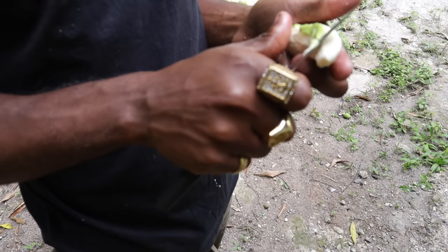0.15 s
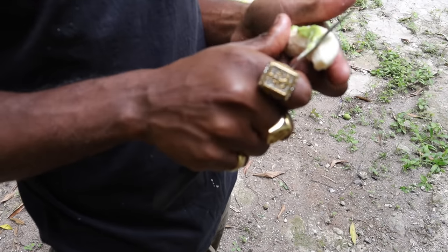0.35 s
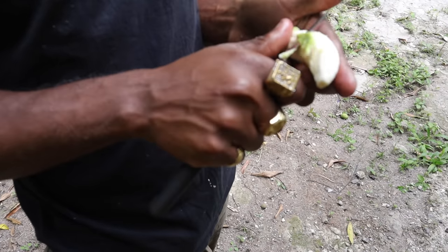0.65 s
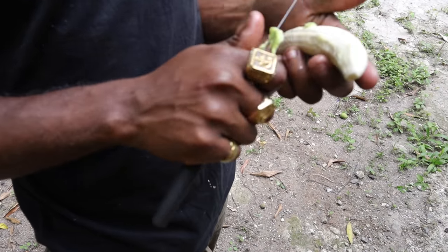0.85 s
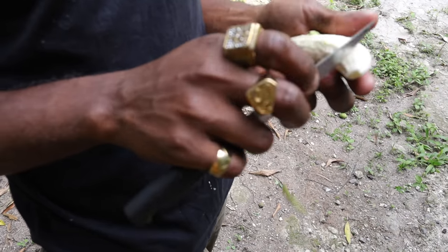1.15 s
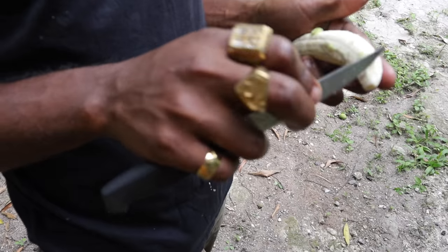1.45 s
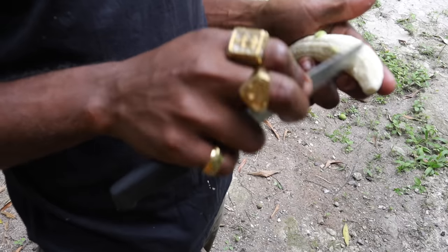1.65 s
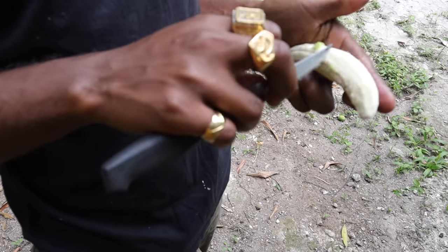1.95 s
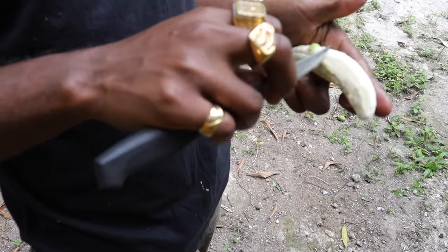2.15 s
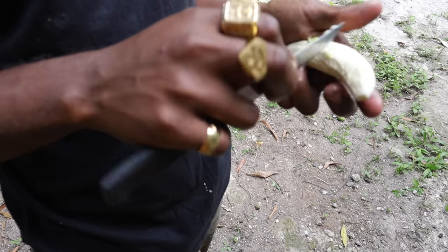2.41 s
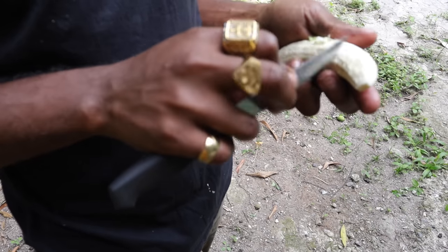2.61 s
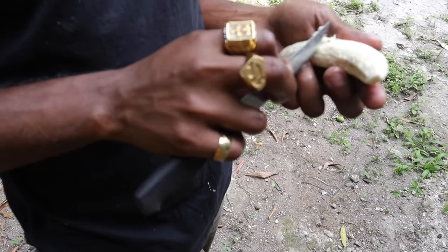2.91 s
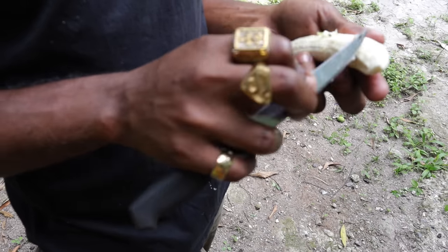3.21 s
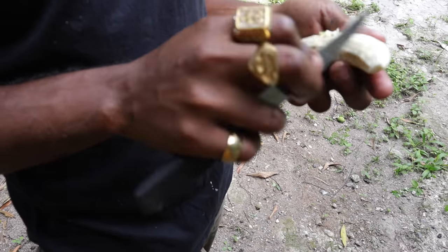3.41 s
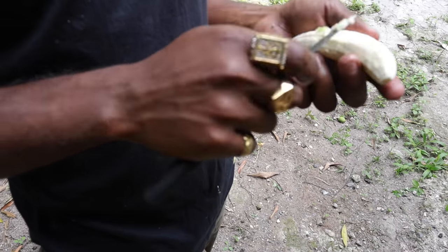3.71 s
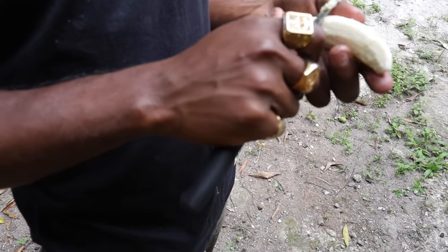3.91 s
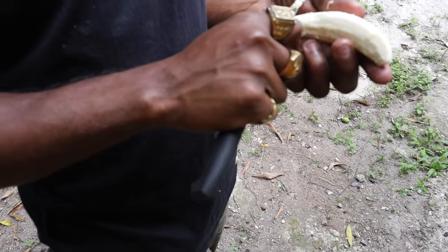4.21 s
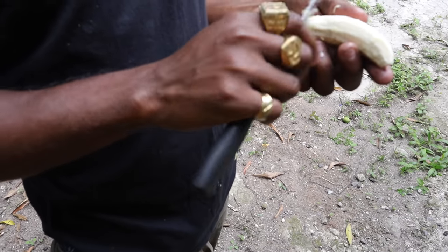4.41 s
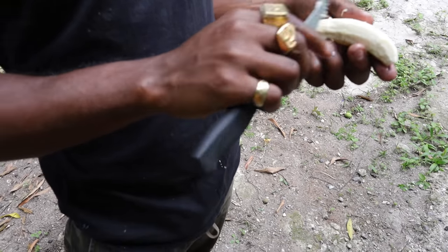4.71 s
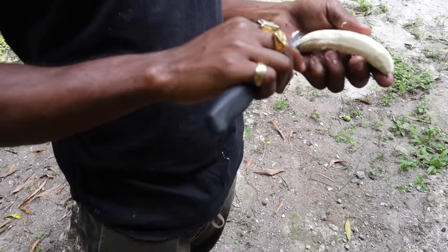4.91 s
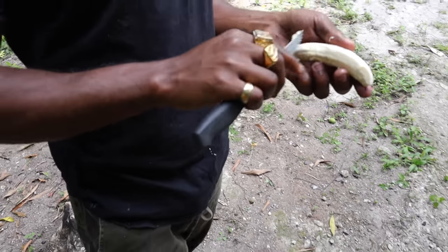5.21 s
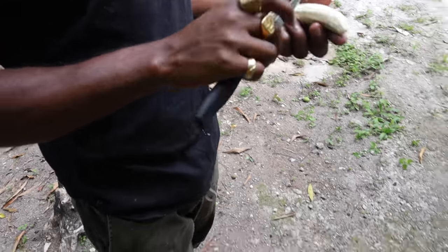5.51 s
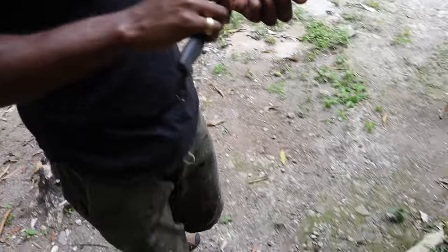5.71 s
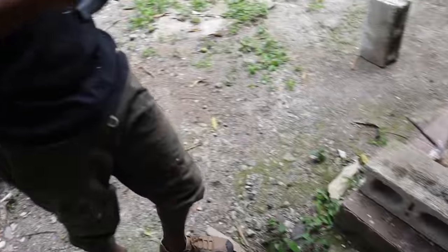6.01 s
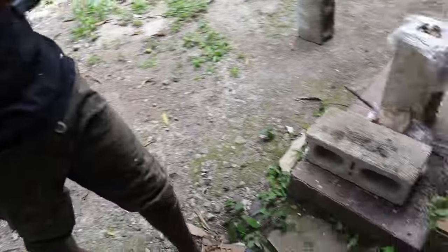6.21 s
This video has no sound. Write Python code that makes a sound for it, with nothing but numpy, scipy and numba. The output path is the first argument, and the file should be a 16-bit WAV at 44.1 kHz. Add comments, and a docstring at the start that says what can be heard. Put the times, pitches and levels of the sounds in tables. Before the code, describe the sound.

Short irregular knife scrapes on raw banana skin, close up in a quiet yard, with faint birdsong, then sharp snaps and shuffling feet.

```python
"""A knife scrapes the skin off a green banana held close, outdoors in a yard, over noise-band hush and breeze rumble.
From the start come short gritty strokes: hissing noise, and random slips that ring the fruit. Soon birds whistle
and a far animal hoots: gliding sines with echoes from the trees, a decaying noise tail. Fibres snap now and then,
and mostly in the later part: bursts of cracks ringing damped modes. There feet also knock, as damped sines,
and towards the end they shuffle, as short swells of grit noise."""
import sys
import numpy as np
from scipy import signal
from scipy.io import wavfile
from numba import njit

SR = 44100
rng = np.random.default_rng(int(sys.argv[2]) if len(sys.argv) > 2 else 0)


def master_out(mix):
    """Clip the mix to full scale and print it as 16-bit PCM to the path in sys.argv[1]."""
    frames = np.transpose(np.atleast_2d(mix))
    ceiling = np.clip(frames, -1, 1)
    pcm = np.round(ceiling * 32767).astype(np.int16)
    wavfile.write(sys.argv[1], SR, pcm)


N = 280035

# All levels are relative: mixing gains, filters or random flicker may follow.
# Hush of the yard, spectral density: hz, density_db_per_hz
HUSH_SPECTRUM = [(24, -17), (40, -8), (68, -2.5), (114, -8), (267, -5), (492, -8.5), (675, -7),
                 (1400, -12.5), (2390, -11), (2770, -9), (7900, -26), (11100, -21), (12200, -27),
                 (13500, -74)]
# Breeze rumble on the microphone, spectral density: hz, density_db_per_hz
RUMBLE_SPECTRUM = [(20, -24), (35, 5.5), (60, 7.5), (90, -2.5), (140, -4.5), (220, -17), (400, -29)]
# Gusts on the microphone: peak_s, level_db, width_s (standard deviation)
GUSTS = [(.15, -42, 0.019), (.82, -37, 0.062), (1.54, -45.5, 0.11), (1.74, -33, 0.04), (1.889, -33, 0.011),
         (1.95, -37, 0.015), (2.16, -48, 0.095), (2.305, -37.5, 0.021), (3.2, -49, 0.04),
         (3.352, -31, 0.027), (3.72, -51.5, 0.082), (4.359, -47, 0.074), (4.7, -55, 0.099),
         (6.24, -57, 0.022)]
# Bird whistles: start_s, length_s, first_hz, last_hz, bend (1 glides evenly, more settles early), level_db
BIRD_NOTES = [(.125, 0.025, 2600, 2330, 1.1, -45), (.15, .025, 2350, 2850, 1.1, -44),
              (.178, .04, 2750, 2150, 1.1, -46), (.342, 0.075, 2250, 3550, 1.2, -38.5),
              (1.17, .05, 3380, 2490, 1.2, -48.5), (1.24, .05, 2500, 2207, 1.2, -49),
              (1.945, 0.045, 2350, 3790, 1.1, -43), (2.47, 0.065, 3200, 2460, 1.2, -52),
              (3.748, 0.055, 3600, 2580, 1.5, -41), (3.815, 0.04, 2650, 2200, 1.1, -49),
              (3.888, 0.042, 2330, 3800, 1.2, -40.5), (4.95, 0.06, 2650, 3000, 1.1, -55),
              (5.28, .05, 4050, 3850, 1.1, -51), (5.3, 0.063, 3464, 2450, 1.1, -43),
              (5.86, 0.0345, 2810, 2290, 1.2, -43), (5.945, 0.03, 2650, 3080, 1.3, -47)]
# Far hoots, one with its lower octave: start_s, length_s, first_hz, last_hz, bend (as above), level_db
HOOT_NOTES = [(.492, 0.084, 643, 673, 3.4, -35), (.51, 0.21, 341, 342.5, 1.1, -50),
              (.572, 0.032, 634, 625, 1.1, -45), (.825, 0.088, 673, 634, 1.8, -45),
              (.91, 0.04, 640, 620, 1.1, -46.5), (2.25, 0.047, 628, 614, 1.2, -52)]
# Dull knocks of feet and hands: start_s, peak_db, pitch_hz, ring_cycles (until 60 dB down)
KNOCKS = [(4.348, -25, 760, 11.5), (4.9311, -19, 1080, 5), (4.938, -23.5, 960, 9), (4.944, -30, 780, 18),
          (5.235, -31, 465, 16), (5.26, -20, 413, 10), (5.268, -22.5, 670, 22), (5.578, -20.5, 765, 21),
          (5.593, -28, 690, 39), (5.647, -24, 890, 9), (6.178, -30, 1280, 4), (6.2271, -19.5, 906, 16),
          (6.233, -21.5, 686, 62), (6.284, -23.5, 483, 22), (6.297, -32, 345, 15)]
# Soles dragging on grit: peak_s, level_db
SHUFFLES = [(5.239, -37), (5.267, -40.5), (6.191, -39), (6.224, -28.5), (6.287, -42), (6.318, -36.5),
            (6.342, -36)]
# Grit under the soles, spectral density: hz, density_db_per_hz
GRIT_SPECTRUM = [(59, -34), (100, -8), (309, -12), (486, -6.5), (1200, -10.5), (5020, -26), (7050, -38),
                 (9000, -95), (11700, -125), (19800, -120)]
# Snapping fibres, and at 2.2758 s a hard catch of the edge sounding the same way: start_s, level_db,
# left_over_right_db, brightness (0-1)
SNAPS = [(0.024, -30, 5, 0), (0.3176, -32.5, -6, 1), (1.002, -10.5, -6.5, 0.98), (1.325, -24, -14, 0.94),
         (1.3316, -22.5, -9, 0.5), (1.3425, -32, -7, .4), (1.3562, -30, -9, 0.9), (1.534, -31.5, -12, 0.2),
         (1.735, -31.5, -9, 0.7), (2.0105, -29, -5, .5), (2.2077, -34, -5, .5), (2.2758, -20.5, -9, 0),
         (2.2786, -30, -1, .5), (3.902, -28.5, 0, 0.1), (4.1465, -36, -3, .3), (4.172, -26.5, 1, 0.62),
         (4.5372, -10, -7, 0), (4.718, -17.5, -17.5, 0.99), (4.722, -19, 6, 0.93), (4.75, -26.5, -4, 0.8),
         (4.9178, -13.5, -3, 0), (5.1273, -18, -7, 0.1), (5.1626, -23, -4, 0.82), (5.3558, -29, -8, 0.4),
         (5.3961, -5, -5, 0.25), (5.4147, -18, 3, 0.85), (5.456, -13.5, -6, 0), (5.485, -24.5, -2.0, 0.5),
         (5.643, -17.5, 0, 0.36), (5.6861, -22.5, 13, 0), (5.758, -9, -4.5, 0.15), (5.9475, -24, -2.0, 0),
         (6.2278, -20.5, 13, 0.49)]
# Dull modes of a snap: mode_hz, level_db, t60_s
DULL_MODES = [(745, -38, 0.0039), (1810, -6, 0.012), (1940, 4.5, 0.0089), (2370, 12, 0.0064),
              (3700, 19.5, 0.0014), (4500, -8, 0.001)]
# Bright modes of a snap: mode_hz, level_db, t60_s
BRIGHT_MODES = [(3900, 11, 0.0016), (6760, 8, 0.00088), (8600, -5, 0.0022), (10670, 6.5, 0.0061)]
# Knife strokes: start_s, slide_ms, hiss_db, bite_peak (share of the slide, 0-1), bite_db, fruit_ring_hz
STROKES = [(0.0, 47, -61, 0.8, -52.5, 2740), (0.3, 24, -61.5, 0.8, -51, 2560),
           (0.444, 124, -49, 0.2, -41, 2300), (0.657, 81.5, -47.5, 0.43, -37.5, 2280),
           (0.763, 28.3, -50, 0.6, -34.5, 2520), (1.02, 49, -57.5, 0.33, -41.5, 2670),
           (1.3, 60, -52.5, 0.71, -39.5, 2370), (1.529, 70, -46, 0.54, -33.5, 2300),
           (1.752, 100, -47, 0.43, -32, 2420), (1.978, 53, -52, 0.3, -37.5, 2410),
           (2.071, 20, -54.5, 0.45, -39.5, 2380), (2.19, 38, -51.5, 0.4, -39, 2400),
           (2.266, 25.4, -49, 0.4, -34.5, 2460), (2.621, 72, -49.5, 0.47, -32, 2340),
           (2.852, 63, -48.5, 0.57, -26.5, 2320), (3.085, 50.6, -48, 0.65, -29.5, 2340),
           (3.275, 76.6, -46, 0.61, -24.5, 2330), (3.528, 79, -47.5, 0.64, -31, 2290),
           (4.122, 47, -49, 0.4, -36, 2630), (4.273, 26, -58, 0.5, -61, 2260),
           (4.561, 73, -54, 0.42, -34.5, 2580), (4.852, 73, -47, 0.46, -28, 2500),
           (5.094, 49.5, -50, 0.45, -31.5, 2540), (5.354, 49, -50.5, 0.47, -26.5, 2480),
           (5.471, 28, -51.5, 0.3, -43, 2700), (5.672, 121, -50.5, 0.25, -29.5, 2330),
           (5.861, 34, -58.5, 0.46, -38, 2550), (5.958, 97, -47, 0.54, -31.5, 2240)]
# Hardest catches of the edge within the bites: catch_s, level_db
CATCHES = [(0.766, -28.5), (0.7742, -31), (0.7795, -25.5), (1.3346, -38), (1.3437, -41), (1.36, -23.5),
           (1.547, -39), (1.5735, -39), (1.5936, -36), (1.7817, -29), (1.8084, -23), (1.8239, -24.5),
           (1.9965, -30), (2.0135, -21), (2.0855, -31), (2.2, -35), (2.2087, -25), (2.2187, -30.9),
           (2.6565, -25), (2.6635, -21), (2.678, -22), (2.857, -22.5), (2.88, -19.5), (2.8954, -22.5),
           (2.9037, -30), (2.9172, -23.5), (2.931, -30.5), (3.098, -20.5), (3.11, -25.5), (3.1225, -24.5),
           (3.1285, -28), (3.138, -35), (3.293, -23), (3.3097, -23.5), (3.3208, -16.5), (3.343, -26.5),
           (3.3527, -40), (3.3634, -45), (3.5543, -43), (3.5734, -29.3), (3.588, -27), (3.6016, -23),
           (4.15, -24), (4.5704, -30.5), (4.5866, -30), (4.5985, -30.6), (4.62, -31), (4.8587, -21),
           (4.87, -25), (4.883, -28), (4.8934, -28.3), (4.9115, -20.5), (5.1074, -26.5), (5.1172, -33),
           (5.3736, -33), (5.383, -27), (5.3907, -26.6), (5.6569, -14), (5.676, -27), (5.6947, -19),
           (5.7157, -34), (5.7284, -33), (5.7453, -34), (5.976, -28), (5.9958, -21.5), (6.0123, -16),
           (6.0215, -30), (6.031, -38), (6.0496, -38)]
# Hiss of the blade, spectral density: hz, density_db_per_hz
EDGE_SPECTRUM = [(900, 5.5), (1500, -15.5), (3500, 3), (5500, 4), (7200, 9), (10000, 3), (12500, 7.5),
                 (14000, -18), (16000, -30)]
# Correlation of the two channels in noise: hz, correlation (-1 to 1)
CORRELATION = [(60, 1), (180, 0.93), (550, 0.04), (1650, -0.41), (4970, -0.68), (15000, -0.93)]

HUSH_DB, CALM_DB = -46, -51.5   # yard hush; breeze between gusts
BIRD_ECHO_T60_S, HOOT_ECHO_T60_S = 1, 0.54
BIRD_ECHO_DB, HOOT_ECHO_DB = 1.2, -6.5
DRAG_RISE_S, DRAG_FALL_S = 0.0015, 0.036   # time constants of a shuffle
TEAR_MS = 2.9   # time constant of the dying cracks of one fibre
BITE_WIDTH = 0.77   # share of the slide
CATCH_RISE_MS, CATCH_FALL_MS = 1.77, 1.86   # time constants of one catch's burst of slips
FRUIT_BANDWIDTH_HZ = 640   # of each of its two resonances in series
NOISE_TOP_HZ, CUTOFF_HZ = 12700, 16300   # upper limits of the coloured noises and of the whole


def amp(db):
    """Amplitude ratio is ten to the power of decibels over twenty."""
    return 10 ** (np.asarray(db) / 20)


def rms_one(x):
    """Dividing by the root mean square gives unit power."""
    return x / np.sqrt(np.mean(x ** 2) + 1e-20)


def at_hz(points, hz):
    """A curve is interpolated linearly along log frequency."""
    points = np.array(points)
    return np.interp(np.log(hz), np.log(points[:, 0]), points[:, 1])


def drift(rate):
    """Slow fluctuation: normal random knots, two per cycle of the rate in Hz, joined by straight lines."""
    knots = rng.standard_normal(int(N / SR * 2 * rate) + 3)
    return np.interp(np.arange(N) / SR * 2 * rate, np.arange(len(knots)), knots)


def noise():
    """White noise as two independent mid-side pairs."""
    return rng.standard_normal((2, 2, N))


def grains(per_s, spread_db):
    """Shot noise: random clicks of either sign and very uneven size."""
    sizes = amp(spread_db * np.minimum(rng.exponential(1, N), 4)) * rng.choice([-1, 1], N)
    return rms_one(sizes * (rng.random(N) < per_s / SR))


def ring(clicks, hz, t60):
    """Damped oscillator: a unit click starts a decaying sine of initial height near 1."""
    radius, angle = amp(-60 / (t60 * SR)), 2 * np.pi * hz / SR
    feedback = [1, -2 * radius * np.cos(angle), radius ** 2]
    return signal.lfilter([0, np.sin(angle)], feedback, clicks + 1e-18)


@njit
def moving_resonance(x, hz, r, sr):
    """Time-varying resonator: a pole pair of radius r follows the centre frequency hz."""
    y = np.zeros(len(x))
    for i in range(2, len(x)):
        y[i] = x[i] - x[i - 2] + 2 * r * np.cos(2 * np.pi * hz[i] / sr) * y[i - 1] - r * r * y[i - 2]
    return y


def coloured(spectrum, source, patchy_db, wide=1.):
    """Subband shaping: half-octaves, each with its level, flicker and stereo correlation; top cut, rms 1."""
    out, edges = 0, 20 * 2 ** np.arange(0, 10, .5)
    for k, (low, high) in enumerate(zip(edges, edges[1:])):
        hz = np.sqrt(low * high)
        if spectrum[0][0] / 1.5 < hz < spectrum[-1][0] * 1.2:
            band = signal.butter(2, [low, high], "band", fs=SR, output="sos")
            mid, side = signal.sosfilt(band, source[k % 2])   # neighbouring bands stay independent
            alike = np.clip(1 - wide * (1 - at_hz(CORRELATION, hz)), -1, 1)
            gain = amp(at_hz(spectrum, hz) + patchy_db * drift(9))
            stereo = np.sqrt(1 + alike) * mid + np.sqrt(1 - alike) * side * [[1], [-1]]
            out = out + gain * stereo
    top_cut = signal.butter(14, NOISE_TOP_HZ, fs=SR, output="sos")
    return rms_one(signal.sosfilt(top_cut, out))


def hush():
    """Diffuse ambience: steady coloured noise, a little stronger on the right."""
    return amp(HUSH_DB) * coloured(HUSH_SPECTRUM, noise(), patchy_db=2.5) * amp([[-.7], [.7]])


def breeze():
    """Wind noise: a low rumble whose amplitude swells as a Gaussian in each gust."""
    t = np.arange(N) / SR
    level = amp(CALM_DB)
    for peak_s, db, width_s in GUSTS:
        level = level + amp(db) * np.exp(-.5 * ((t - peak_s) / width_s) ** 2)
    rumble = coloured(RUMBLE_SPECTRUM, noise(), patchy_db=3.5, wide=6.8)
    return level * rumble * amp([[1.2], [-1.2]])


def trees(x, t60, wet_db):
    """Scattering: convolution with an exponentially dying noise tail, another one for each side."""
    t = np.arange(SR) / SR
    tail = rng.standard_normal((2, SR)) * amp(-60 * t / t60) * np.minimum(t / 0.0038, 1)
    tail = tail - 0.12 * tail[::-1]   # the wide microphone sets the sides against each other
    tail = amp(wet_db) * tail / np.sqrt(np.sum(tail ** 2, axis=1, keepdims=True))
    return signal.fftconvolve(x[None], tail, axes=1)[:, :N]


def whistle(notes, waver, flutter_db, swell_share):
    """Frequency modulation: sines glide to their last pitch, swelling and fading; pitch and level waver."""
    out, wobble = np.zeros(N), 1 + waver * drift(70)
    for start_s, length_s, first_hz, last_hz, bend, db in notes:
        gone = np.linspace(0, 1, round(length_s * SR))   # share of the note
        at = round(start_s * SR)
        span = slice(at, at + len(gone))
        hz = last_hz + (first_hz - last_hz) * (1 - gone) ** bend
        phase = 2 * np.pi * np.cumsum(hz * wobble[span]) / SR
        swell = np.sin(np.pi / 2 * np.minimum(np.minimum(gone, 1 - gone) / swell_share, 1))
        out[span] += np.sqrt(2) * amp(db) * swell * np.sin(phase)
    return out * amp(flutter_db * drift(40))


def birds():
    """Direct and scattered sound: whistles stronger on the left, opposite in phase on the right, with echoes."""
    direct = whistle(BIRD_NOTES, waver=0.0249, flutter_db=3.0, swell_share=0.24)
    return direct * [[1.1], [-.45]] + trees(direct, BIRD_ECHO_T60_S, BIRD_ECHO_DB)


def hoots():
    """Direct and scattered sound: low, nearly level tones in the centre, with a weaker, shorter echo."""
    direct = whistle(HOOT_NOTES, waver=0.007, flutter_db=.6, swell_share=0.39)
    return direct + trees(direct, HOOT_ECHO_T60_S, HOOT_ECHO_DB)


def knocks():
    """Impact: a soft contact pulse excites two damped modes of the hollow ground."""
    out = np.zeros(N)
    for start_s, db, hz, cycles in KNOCKS:
        click = np.zeros(4000)
        click[:14] = -np.hanning(14)
        sound = ring(click, hz, cycles / hz) + 0.89 * ring(click, 1.84 * hz, 0.2 * cycles / hz)
        at = round(start_s * SR)
        out[at:at + 4000] += (amp(db) * sound / np.abs(sound).max())[:N - at]
    return out


def shuffles():
    """Friction: soles drag on grit, noise that rises abruptly and decays exponentially."""
    peak_s, db = np.array(SHUFFLES).T
    since = np.arange(N) / SR - peak_s[:, None]
    drag = amp(db) @ np.exp(-np.abs(since) / np.where(since < 0, DRAG_RISE_S, DRAG_FALL_S))
    grit = noise() * amp(4.6 * drift(55))
    return drag * coloured(GRIT_SPECTRUM, grit, patchy_db=1.0, wide=0.5)


def strike(modes, cracks):
    """Modal superposition: the same cracks excite every damped mode."""
    return sum(amp(db) * ring(cracks, hz, t60) for hz, db, t60 in modes)


def snaps():
    """Fracture: a fibre tears in a few fast dying cracks, each exciting dull and bright modes."""
    length = 2000
    out = np.zeros((2, N + length))
    fading = np.exp(-np.arange(length) / (SR * TEAR_MS / 1000))
    for start_s, db, pan_db, bright in SNAPS:
        chance, size, side_sign = rng.random((3, length))
        cracks = (chance < .09) * (2 * size - 1) * fading * 0.76
        cracks[0], cracks[5] = -.6, 1.1   # a pull, then the release
        share = np.clip(bright, 0, 1)
        sound = (1 - share) * strike(DULL_MODES, cracks) + share * strike(BRIGHT_MODES, cracks)
        # the treble differs on the two sides
        wide = share * ring(cracks * np.sign(side_sign - .5), 9260, 0.0016) * 5.9
        gain = amp(db) / np.abs(sound).max() * amp([[pan_db / 2], [-pan_db / 2]])
        at = round(start_s * SR) + 25   # the first crack sounds 25 samples after start_s
        out[:, at:at + length] += gain * (sound + wide * [[1], [-1]])
    # a small source radiates no bass
    return signal.sosfilt(signal.butter(2, [450, 11000], "band", fs=SR, output="sos"), out[:, :N])


def stroke_envelopes():
    """Sliding contact: the hiss starts abruptly and trails off, the bite peaks within the slide."""
    hiss, bite, ring_hz = np.zeros(N), np.zeros(N), np.full(N, float(STROKES[0][-1]))
    for start_s, slide_ms, hiss_db, bite_at, bite_db, hz in STROKES:
        near = slice(max(round((start_s - .1) * SR), 0), min(round((start_s + .3) * SR), N))
        since_ms = (np.arange(near.start, near.stop) / SR - start_s) * 1000
        middle = np.abs(2 * since_ms / slide_ms - 1)   # 0 mid-stroke, 1 at its ends
        steepness = np.where(since_ms < slide_ms / 2, 5.0, 3.3)
        hiss[near] += amp(hiss_db - 3.85 * middle ** steepness)
        off = 2 * (since_ms / slide_ms - bite_at) / BITE_WIDTH
        off = np.where(off < 0, -1.25 * off, 0.89 * off)   # it digs in faster than it lets go
        bite[near] += amp(bite_db - 4.0 - 4.45 * off ** 2.22)
        ring_hz[max(round((start_s - .03) * SR), 0):] = hz
    return hiss, bite, ring_hz * (1 + .06 * drift(45))   # the grip shifts within a stroke


def strokes():
    """Stick-slip friction: the edge hisses; where it bites, dense slips ring the fruit in the cupped hand."""
    hiss, bite, ring_hz = stroke_envelopes()
    damping = np.exp(-np.pi * FRUIT_BANDWIDTH_HZ / SR)

    def fruit(x):
        """Cascaded resonance: two equal resonators follow the pitch of the fruit."""
        once = moving_resonance(x, ring_hz, damping, SR)
        return moving_resonance(once, ring_hz, damping, SR)

    catches = np.zeros(N)
    for catch_s, db in CATCHES:
        catches[round(catch_s * SR)] = amp(db)
    lag_ms = np.arange(-800, 801) / SR * 1000
    burst = np.exp(-np.abs(lag_ms) / np.where(lag_ms < 0, CATCH_RISE_MS, CATCH_FALL_MS))
    tearing = np.abs(signal.fftconvolve(catches, burst, "same"))   # each catch lets go a burst of slips
    ragged = amp(3.0 * drift(70) - 2.5)   # the skin gives way unevenly
    bite = bite * ragged + amp(-8.0) * tearing
    hiss = hiss + amp(-30.5) * tearing
    # the double ring swells to about 1 / (1 - damping)
    caught = fruit(catches + 1e-18) * (1 - damping) * amp(-8.0)

    shared = grains(1500, spread_db=1.5) * amp(0.77 * drift(90))
    sides = []
    for level_db in (-3.6, 2.4):   # the hands are to the right
        slips = shared + 0.87 * grains(2500, spread_db=2.5)
        lower = ring(ring(slips, 1530, 0.0032), 1564, 0.011)
        upper = ring(slips, 3240, 0.00062)
        body = rms_one(fruit(slips)) + amp(-12.5) * rms_one(lower) + amp(-15.5) * rms_one(upper)
        sides.append(amp(level_db) * (bite * rms_one(body) + caught))
    uneven = amp(2.4 * drift(160))
    rough = coloured(EDGE_SPECTRUM, noise() * uneven, patchy_db=4.0, wide=0.68)
    return np.array(sides) + hiss * amp(6.5) * rough


def scene():
    """Superposition: the sound pressures of all sources add."""
    return hush() + breeze() + birds() + hoots() + knocks() + shuffles() + snaps() + strokes()


def record(dry):
    """Band limitation: a steep low-pass filter removes the top."""
    return signal.sosfilt(signal.cheby2(12, 70, CUTOFF_HZ, fs=SR, output="sos"), dry)


dry = scene()
out = record(dry)
master_out(out)
```